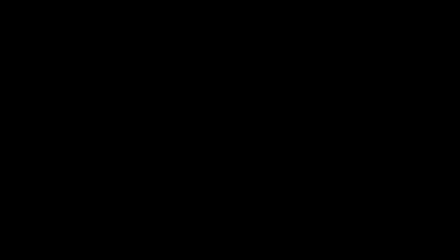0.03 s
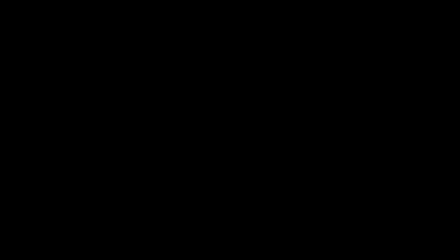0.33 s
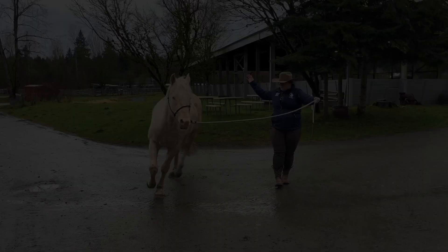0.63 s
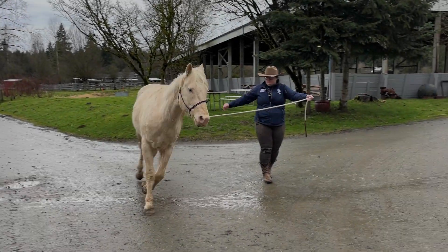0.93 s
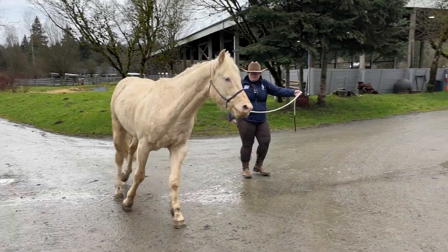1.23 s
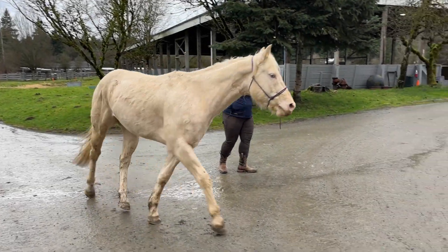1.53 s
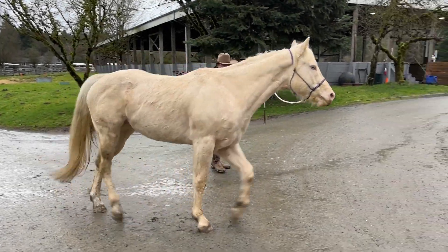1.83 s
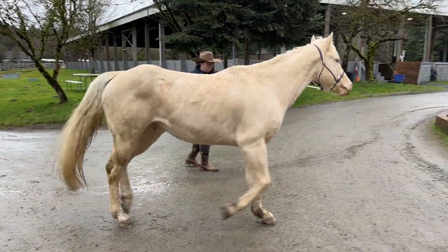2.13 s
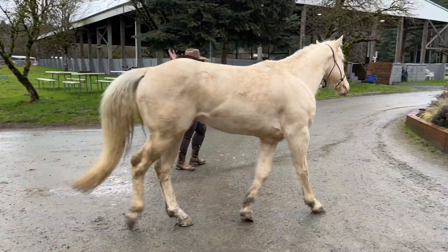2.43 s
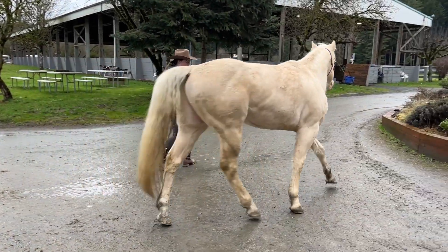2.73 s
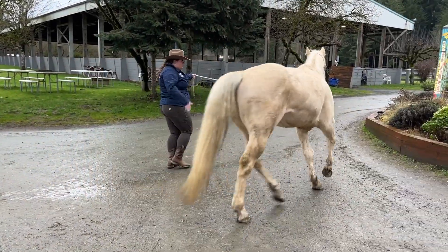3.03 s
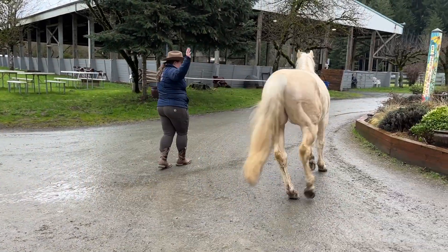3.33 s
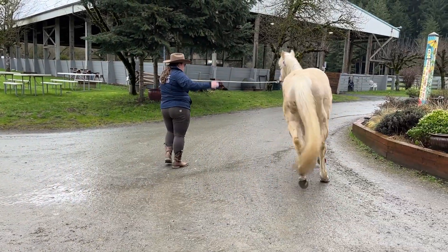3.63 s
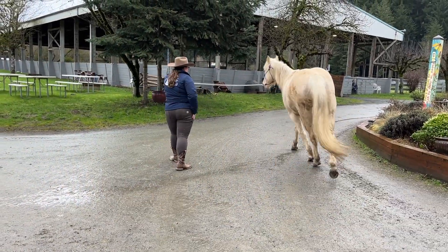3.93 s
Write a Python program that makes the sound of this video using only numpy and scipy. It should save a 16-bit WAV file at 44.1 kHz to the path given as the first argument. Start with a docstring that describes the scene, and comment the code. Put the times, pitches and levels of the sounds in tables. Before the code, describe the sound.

A horse steps past close to the microphone on wet, gritty ground outdoors. Each hoof lands with a hollow clop and a crunch, and a few clack sharply on stone, over a faint low rumble.

```python
"""A horse led in an arc past a close microphone pair, outdoors on wet, gritty hard ground.
Each hoof lands with a hollow clop and a thud, crunches the grit and flicks small stones;
three blows of the rim on stone clack sharply. Behind it lie a low rumble with a hum, a faint hiss,
a few soft swishes and a distant bird. Nearby buildings answer weakly."""
import sys
import numpy as np
from scipy import signal
from scipy.fft import rfft, irfft, next_fast_len
from scipy.io import wavfile
from scipy.ndimage import map_coordinates

SR = 44100
rng = np.random.default_rng(int(sys.argv[2]) if len(sys.argv) > 2 else 0)


def unload_wav(signal):
    """Save mono or channel-first audio to the path in sys.argv[1] as 16-bit WAV at rate SR, clipped to [-1, 1]."""
    wavfile.write(
        sys.argv[1],
        SR,
        np.round(np.clip(np.atleast_2d(signal).T, -1, 1) * 32767).astype(np.int16),
    )


N = 176400
GRAIN_SPREAD_DB = 4.3  # how unequal the impacts of grit and pebbles are


def amp(db):
    """Decibels to gain."""
    return 10 ** (np.asarray(db) / 20)


def unit(x):
    """Scale to rms 1."""
    return x / np.sqrt(np.mean(x ** 2) + 1e-20)


def along(points, hz):
    """Read (f/Hz, value) points on a log frequency axis."""
    f, values = np.transpose(points)
    return np.interp(np.log(hz + 1), np.log(f + 1), values)


def wobble(rate, size=N):
    """A smooth random curve, rate knots a second."""
    return map_coordinates(rng.standard_normal(8192), [np.arange(size) * rate / SR + 2], mode='mirror')


def filtered(x, response):
    """Multiply the spectrum of x by response(hz)."""
    n = x.shape[-1]
    padded = next_fast_len(n + 4096)
    return irfft(rfft(x, padded) * response(np.fft.rfftfreq(padded, 1 / SR)), padded)[..., :n]


def noise(level_db):
    """Two unrelated noises with the spectrum level_db(hz), at rms 1."""
    return unit(filtered(rng.standard_normal((2, N)), lambda hz: amp(level_db(hz))))


def add(track, s, sound):
    """Mix a sound in at time s."""
    i = int(round(s * SR))
    part = sound[..., max(-i, 0):max(N - i, 0)]
    track[..., max(i, 0):max(i, 0) + part.shape[-1]] += part


def spread(pair):
    """Blend two unrelated signals into partly alike left and right."""
    # likeness of the two channels: f/Hz, correlation
    likeness = [(60, 1), (500, 0.68), (1100, 0.067), (2000, 0.77), (3800, 0.6), (5200, 0.23), (7000, 0.92),
                (8400, 0.97), (15000, 0.99)]
    turn = lambda hz: np.arccos(np.clip(along(likeness, hz), 0, 1)) / 2
    mid, side = filtered(pair, lambda hz: np.array([np.cos(turn(hz)), np.sin(turn(hz))]))
    return np.array([mid + side, mid - side])


def background():
    """The bed of the place: low rumble, a wavering hum and a faint hiss that comes and goes."""
    # spectra of rumble and hiss: f/Hz, level/dB
    rumble_shape = [(25, -29), (48, 0.5), (70, 2), (105, -3), (190, -7), (300, -11), (450, -17), (900, -21),
                    (1500, -27), (3000, -48.5), (8000, -82), (16000, -60)]
    hiss_shape = [(500, -29), (1500, 2.5), (3500, 2), (6000, -4.5), (10000, -7), (16000, -10)]
    # course of the hiss: t/s, level/dB
    hiss_level = [(0, -57.5), (.3, -72.5), (.72, -71.5), (.82, -56.5), (1.45, -67.5), (1.7, -52),
                  (1.85, -72), (2.1, -50), (2.25, -57.5), (3.2, -64), (3.37, -65.5), (3.5, -56.5),
                  (3.74, -66), (4, -78)]
    # hum tones: f/Hz, level/dB, fade/(dB/s)
    hum_tones = [(73.5, -50, 1.5), (102.6, -50.5, 1), (380.7, -59, 11)]
    t = np.arange(N) / SR
    rumble = amp(-45 + 1.1 * wobble(5.72)) * noise(lambda hz: along(rumble_shape, hz))
    hiss_db = np.interp(t, *np.transpose(hiss_level)) + 1.2 * wobble(32.1)
    hiss = amp(hiss_db) * noise(lambda hz: along(hiss_shape, hz))
    hum = np.zeros(N)
    for hz, db, fade in hum_tones:
        level = amp(db - fade * t + 4.4 * wobble(7))
        hum += level * np.sqrt(2) * np.sin(2 * np.pi * hz * t + np.sqrt(hz / 100) * wobble(7.8))
    return spread(rumble + hiss) + hum


def grains(per_s, size):
    """Two random trains of tiny grit impacts of very unequal strength."""
    hits = rng.random((2, size)) < per_s / SR
    polarity = np.sign(rng.standard_normal((2, size)))
    strength = amp(GRAIN_SPREAD_DB * np.minimum(rng.exponential(size=(2, size)), 4))
    return unit(hits * polarity * strength)


def pebbles(per_s, size):
    """A random train of small stones, each ticking at its own pitch."""
    low_hz, high_hz, t60_cycles = 900, 13000, 15
    t = np.arange(SR // 100) / SR
    when, tone, chance = rng.random((int(per_s * size / SR), 3)).T[..., None]
    hz = low_hz * (high_hz / low_hz) ** tone
    strength_db = -GRAIN_SPREAD_DB * np.log(chance + .035)
    ticks = hz * amp(strength_db - 60 * t * hz / t60_cycles) * np.sin(2 * np.pi * hz * t)
    places = (when * size).astype(int) + np.arange(len(t))
    return unit(np.bincount(places.ravel(), ticks.ravel(), size)[:size])


def scuffs():
    """Grit and pebbles crackle under each swell of pressure; loose grains patter down afterwards."""
    # grit crushed or scraped under a hoof: peak t/s, level/dB, rise/s, t60/s, tilt/(dB/octave)
    crushes = [(0.114, -54.5, 0.071, 0.54, 0.5), (0.47, -44, 0.0022, .06, 1),
               (0.497, -53.5, 0.024, 0.44, -1.5), (0.762, -28, 0.0027, 0.012, 9.5),
               (0.866, -44, 0.012, 0.12, 0), (1.23, -34, 0.0052, 0.027, 6.5), (1.247, -44, 0.023, 0.16, -3),
               (1.354, -45, 0.0071, 0.25, 1), (1.505, -33.5, 0.0028, 0.063, 7),
               (1.573, -40, 0.01, 0.035, 0.5), (1.621, -35.5, 0.013, 0.11, 0),
               (2.002, -29.5, 0.013, 0.11, 0), (2.095, -67, 0.013, 0.58, -1),
               (2.157, -35, 0.00062, 0.089, 2), (2.298, -42, 0.012, 0.19, 2.5),
               (2.378, -31.5, 0.011, 0.11, -0.5), (2.417, -39, 0.0059, 0.19, 0),
               (2.464, -42, 0.017, 0.034, -3.5), (2.483, -32, 0.0024, 0.016, -1),
               (2.701, -53, 0.017, 0.76, 0.5), (2.76, -38.5, 0.017, 0.12, 1),
               (2.802, -27, 0.0037, 0.039, -1), (2.934, -41.5, 0.024, 0.044, -4),
               (3.086, -33.5, 0.012, 0.029, -2), (3.1, -34, 0.0058, 0.076, 2), (3.135, -40, 0.01, 0.22, 1),
               (3.185, -43, 0.0035, 0.2, 1.5), (3.474, -41.5, 0.0026, 0.029, 3),
               (3.589, -29.5, 0.004, 0.1, 0.5), (3.606, -38.5, 0.0058, 0.11, 5),
               (3.851, -37, 0.0067, 0.029, 1), (3.889, -44, 0.026, 0.19, -2.5),
               (3.919, -46.5, 0.0094, 0.19, 1.5), (3.984, -34, 0.008, 0.043, 2)]
    # spectrum of the grit: f/Hz, level/dB
    grit = [(120, -71), (300, -8.5), (650, -5), (1200, 2.5), (1500, -3.5), (1800, -4), (2900, -4.5),
            (3600, -2.5), (5500, -7), (8500, -7.5), (12000, -8.5), (16000, -10)]
    clumps_per_s, clump_db, colour_db = 260, 3.8, 2
    spray_db, spray_fall_s = -27.5, 0.082
    out, loose = np.zeros((2, N)), np.zeros(N)
    before = SR // 6
    t = (np.arange(SR // 2) - before) / SR
    gravel = np.array([pebbles(per_s=1300, size=N + SR) for _ in range(2)])
    for s, db, rise_s, t60, tilt_db in crushes:
        crackle = grains(per_s=3500, size=len(t)) + gravel[:, int(s * SR):][:, :len(t)]
        crackle *= amp(clump_db * wobble(clumps_per_s, len(t)))
        # each patch of ground has its own colour
        patch = np.column_stack([np.geomspace(300, 16000, 28), colour_db * rng.standard_normal(28)])
        tilt = lambda hz: tilt_db * np.log2((hz + 200) / 3000)
        crackle = unit(filtered(crackle, lambda hz: amp(along(grit, hz) + along(patch, hz) + tilt(hz))))
        swell = np.exp(-(np.maximum(-t, 0) / rise_s) ** 1.27)
        release = amp(-60 * np.maximum(t, 0) / t60)
        add(out, s - before / SR, amp(db) * swell * release * crackle)
        add(loose, s, amp(db) * np.exp(-(t - t[0]) / spray_fall_s))
    falling = np.array([pebbles(per_s=340, size=N) for _ in range(2)])
    spray = unit(filtered(falling, lambda hz: amp(along(grit, hz))))
    return spread(out + amp(spray_db) * loose * spray)


def ring(modes, attack_s, pitch=1):
    """Damped modes, a little different at each blow."""
    t = np.arange(SR // 6) / SR
    scatter = rng.standard_normal((len(modes), 2)) * [1, .015]
    out = np.zeros(len(t))
    for k, ((hz, db, t60), (extra_db, detune)) in enumerate(zip(modes, scatter)):
        tone = np.sin(2 * np.pi * hz * pitch * (1 + detune) * t)
        out += (-1) ** k * amp(db + extra_db - 60 * t / t60) * tone
    return out * (1 - np.exp(-t / attack_s))


def hooves():
    """The hollow hoof clops as the weight thuds into the ground."""
    # hoof landings: t/s, thud level/dB, clop level/dB, clop pitch ratio
    landings = [(.118, -31.5, -42, 1.05), (0.484, -33, -58, 1.5), (.762, -44, -43, 1.26),
                (0.865, -29, -31, 1.012), (1.24, -34, -45.5, 1.13), (1.504, -45, -43.5, 1.7),
                (1.617, -28.5, -40.5, 1.17), (2.003, -36, -41, 0.92), (2.089, -34.5, -36, 2.6),
                (2.414, -30.5, -41, 1.2), (2.804, -32.5, -47, 0.87), (3.2208, -26, -23.5, 0.9),
                (3.601, -37.5, -42, 1.63), (3.891, -29.5, -47, 0.83)]
    # modes of the hollow hoof and of the weight on the ground: f/Hz, level/dB, t60/s
    clop = [(440, 11.5, 0.011), (587, 4, 0.027), (754, 1.5, 0.042), (952, -0.5, 0.044), (2610, -5, 0.015)]
    thud = [(140.4, -3, 0.11), (192, -1, 0.057), (280.7, 1, 0.039)]
    out = np.zeros(N)
    for s, thud_db, clop_db, pitch in landings:
        add(out, s - .001, amp(clop_db) * ring(clop, attack_s=.0016, pitch=pitch))
        add(out, s - .0013, amp(thud_db) * ring(thud, attack_s=.0025))
    return out


def crack(force, low_hz, high_hz):
    """A contact force heard through the band of the struck thing, with the energy of 1 ms at rms 1."""
    poles = lambda ratio: 1 - ratio ** 2 + 1j * np.sqrt(2) * ratio
    highpass = lambda hz: (hz / low_hz) ** 2 / poles(hz / low_hz)
    lowpass = lambda hz: 1 / poles(hz / high_hz) / (1 + .5j * hz / high_hz)
    sound = filtered(force, lambda hz: highpass(hz) * lowpass(hz))
    return sound / np.linalg.norm(sound) * np.sqrt(SR / 1000)


def stones():
    """A stone gives way under a hoof with a snap and a short crumble."""
    # single stones: t/s, level/dB, centre f/Hz
    snaps = [(0.471, -56, 3450), (.568, -48, 3300), (1.352, -35, 3980), (1.517, -40, 1460),
             (1.754, -42, 3800), (2.158, -32, 3240), (2.169, -29.5, 7700), (2.344, -42, 5040),
             (2.393, -31, 2480), (2.4171, -26.5, 3820), (2.4798, -34, 3900), (2.689, -36.5, 7400),
             (2.741, -37, 5000), (2.782, -36, 3140), (2.892, -40, 5500), (3.136, -31.5, 3600),
             (3.257, -42.5, 2400), (3.292, -41, 7560), (3.548, -39.5, 5000)]
    crumble_db, crumble_t60_s, band_ratio = -2.5, 0.012, 1.65
    out, t = np.zeros(N), np.arange(SR // 20) / SR
    for s, db, hz in snaps:
        force = (t == 0) + amp(crumble_db - 60 * t / crumble_t60_s) * rng.standard_normal(len(t))
        add(out, s, amp(db) * crack(force, hz / band_ratio, hz * band_ratio))
    return out


def bird():
    """Thin gliding chirps, blurred by distance into narrow bands of noise."""
    # chirps: t/s, length/s, start f/Hz, end f/Hz, level/dB
    chirps = [(0.696, 0.03, 4650, 4550, -61.5), (0.707, 0.055, 5000, 4450, -67),
              (0.807, 0.095, 3980, 4130, -58), (0.884, 0.26, 4170, 4400, -66)]
    blur_per_s, waver_hz = 250, 100
    out = np.zeros(N)
    for s, length, start_hz, end_hz, db in chirps:
        n = int(length * SR)
        hz = np.linspace(start_hz, end_hz, n) + waver_hz * wobble(38, n)
        phase = 2 * np.pi * np.cumsum(hz) / SR
        call = wobble(blur_per_s, n) * np.sin(phase) + wobble(blur_per_s, n) * np.cos(phase)
        add(out, s, amp(db) * np.sqrt(np.hanning(n)) * call)
    return out


def clinks():
    """Rubbing on a stone swells into one rough resonance, which rings out."""
    # ringing contacts, low in the hollow hoof, high in a stone: t/s, level/dB, f/Hz
    contacts = [(1.228, -42.5, 6400), (1.246, -33.5, 2670), (1.35, -31, 4070), (1.37, -39, 4050),
                (1.505, -30.5, 1022), (1.515, -32, 6600), (1.571, -32.5, 1234), (2.087, -23, 1440),
                (2.758, -28, 4350), (2.803, -38, 1053), (3.08, -29, 1200), (3.128, -24, 1170),
                (3.886, -32, 1683)]
    rise_s, t60_s, roughness = .003, .038, .55
    out, t = np.zeros(N), np.arange(SR // 10) / SR
    for s, db, hz in contacts:
        phase = 2 * np.pi * hz * t + roughness * np.sqrt(hz / 1000) * wobble(hz / 10, len(t))
        add(out, s, amp(db - 60 * t / t60_s) * (1 - np.exp(-t / rise_s)) * np.sin(phase))
    return out


def clacks():
    """The hoof's rim grinds over stone, touches and strikes home just after: a dry double crack."""
    # blows of the rim: t/s, level/dB, low edge f/Hz, high edge f/Hz
    blows = [(2.0894, -16, 1010, 2200), (2.9308, -12.5, 450, 4700), (3.8918, -23.5, 640, 4030)]
    grind_db, grind_s, touch_db, touch_lead_s = -20.5, 0.0021, -7, 0.001272
    out, strike = np.zeros(N), SR // 50
    t = np.arange(-strike, strike) / SR
    for s, db, low_hz, high_hz in blows:
        force = amp(grind_db) * np.exp(-np.abs(t) / grind_s) * rng.standard_normal(len(t))
        force[strike] += 1
        force[strike - int(touch_lead_s * SR)] += amp(touch_db)
        add(out, s - strike / SR, amp(db) * crack(force, low_hz, high_hz))
    return out


def swishes():
    """Air and fibre noise swells and fades in step with the walk, perhaps the tail or a sleeve."""
    # soft swells: t/s, level/dB
    swells = [(2.703, -50), (3.06, -47.5), (3.45, -61.5), (3.8, -59.5)]
    centre_hz, db_per_octave, half_width_s = 2890, 14, 0.037
    t = np.arange(N) / SR
    band = noise(lambda hz: -db_per_octave * np.abs(np.log2((hz + 1) / centre_hz)))
    envelope = sum(amp(db) * np.exp(-((t - s) / half_width_s) ** 2) for s, db in swells)
    return spread(band * envelope)


def yard(direct):
    """A short diffuse answer from the walls and trees around."""
    # decay of the yard: f/Hz, t60/s
    decay = [(150, 0.12), (1000, 0.16), (4000, 0.15), (12000, 0.1)]
    hz, t, spectra = signal.stft(rng.standard_normal((2, SR // 2)), SR, nperseg=256)
    tail = signal.istft(spectra * amp(-60 * t / along(decay, hz)[:, None]), SR, nperseg=256)[1]
    return spread(signal.fftconvolve(direct, tail / np.linalg.norm(tail[0]), axes=1)[:, :N])


def scene():
    """The open yard: the horse close by, the bird far off, the background behind both."""
    direct = scuffs() + hooves() + clacks() + stones() + clinks() + swishes() + bird()
    return direct + amp(-11.5) * yard(direct) + background()


def record(dry):
    """A close microphone pair shifts the phase between the sides; the sound opens after a brief hush."""
    # phase across the pair: f/Hz, lead of the left side/rad
    phase_lead = [(100, 0), (600, -.3), (900, 1), (1250, 1.2), (1520, 2.6), (1720, .3), (2300, .35),
                  (2950, .95), (4100, .35), (4900, .8), (5500, -1.3), (6600, -1.3), (8420, -3.14),
                  (11700, -6.28), (15500, -9.42)]
    start_s, fade_in_s, top_hz = 0.054, .004, 15900
    opening = np.clip((np.arange(N) / SR - start_s) / fade_in_s, .01, 1)
    sides = np.array([[1], [-1]])
    response = lambda hz: (hz < top_hz) * np.exp(.5j * sides * along(phase_lead, hz))
    return filtered(dry * opening, response)


dry = scene()
out = record(dry)
unload_wav(out)
```